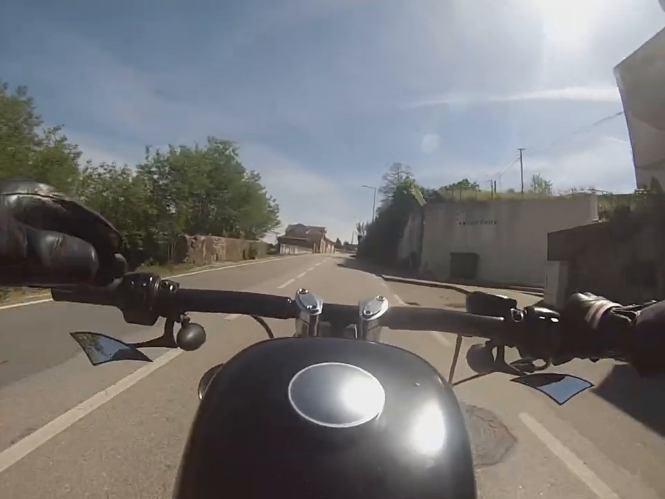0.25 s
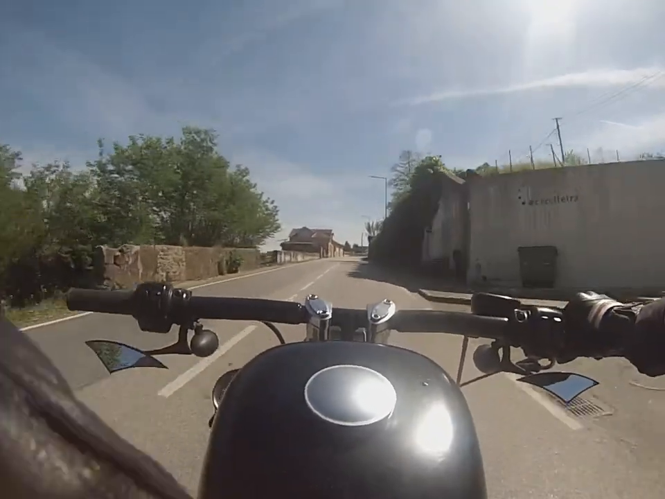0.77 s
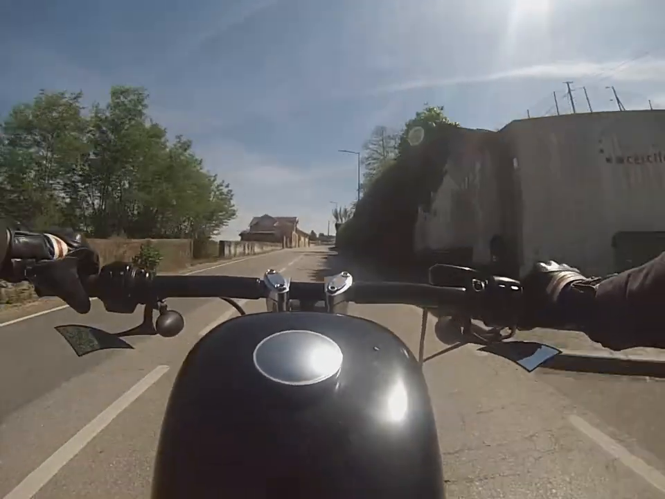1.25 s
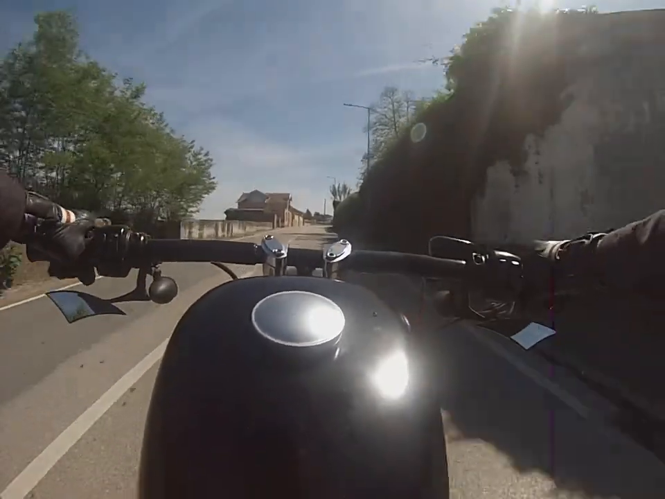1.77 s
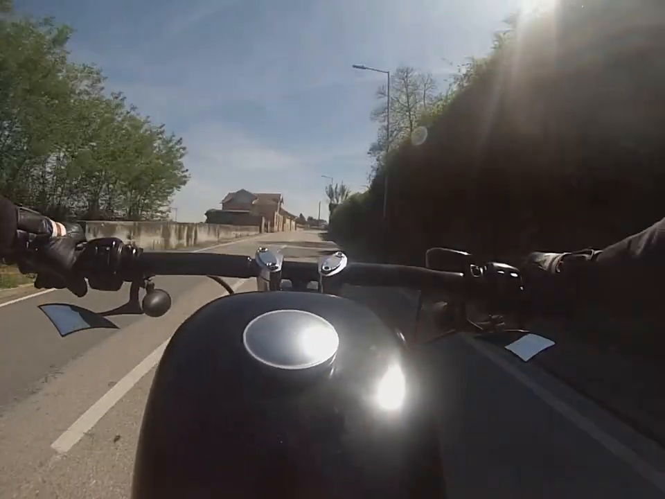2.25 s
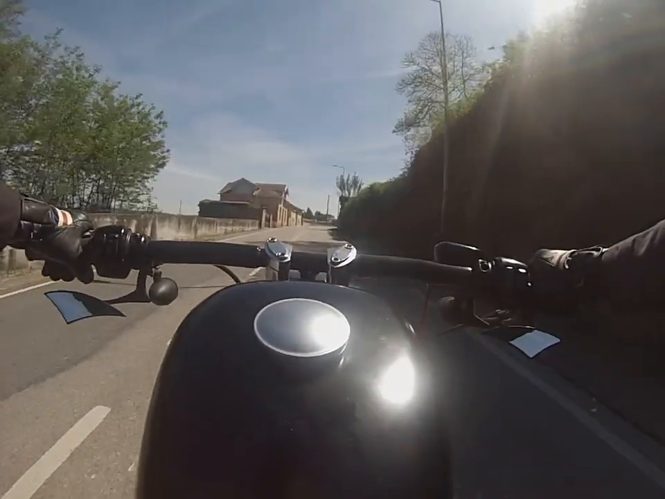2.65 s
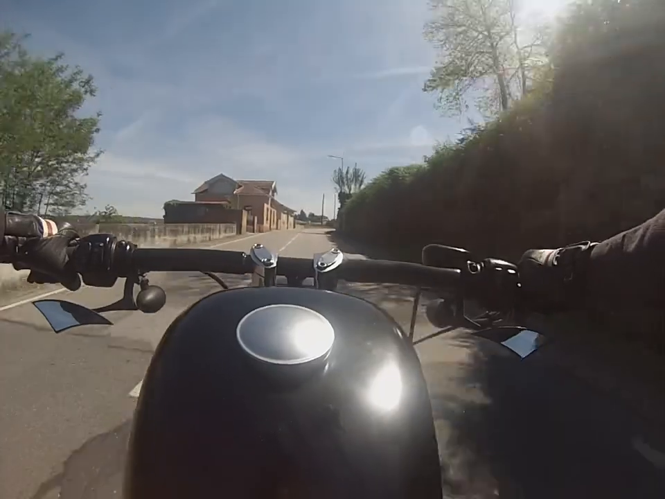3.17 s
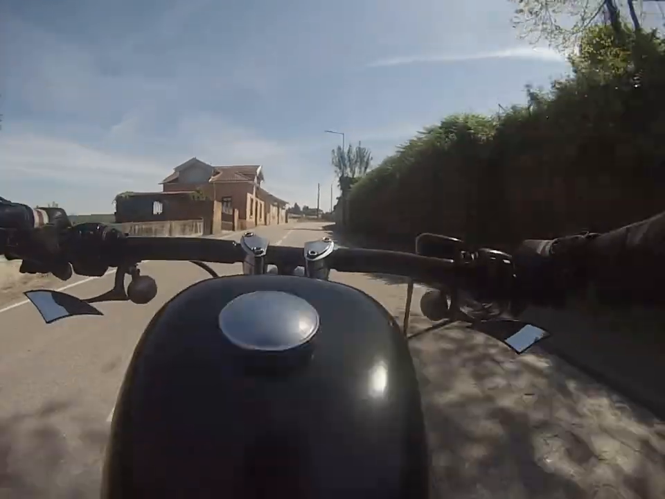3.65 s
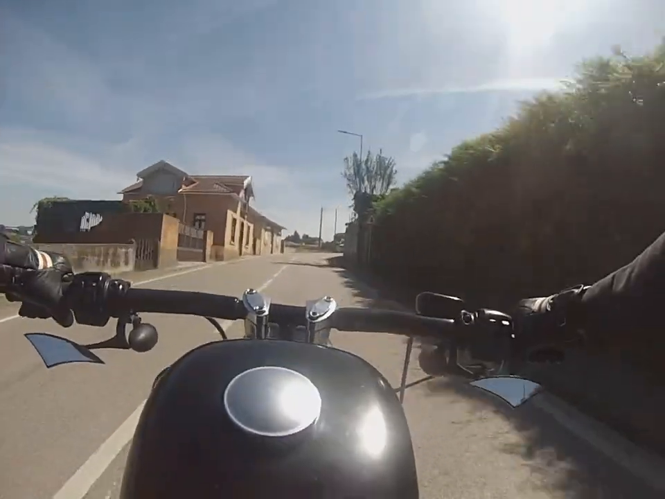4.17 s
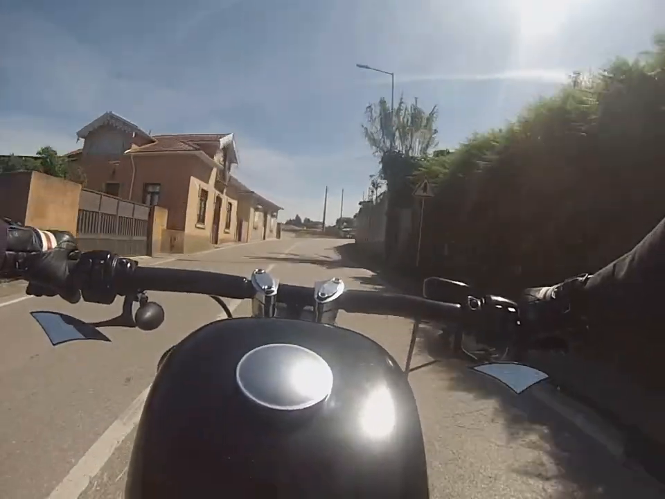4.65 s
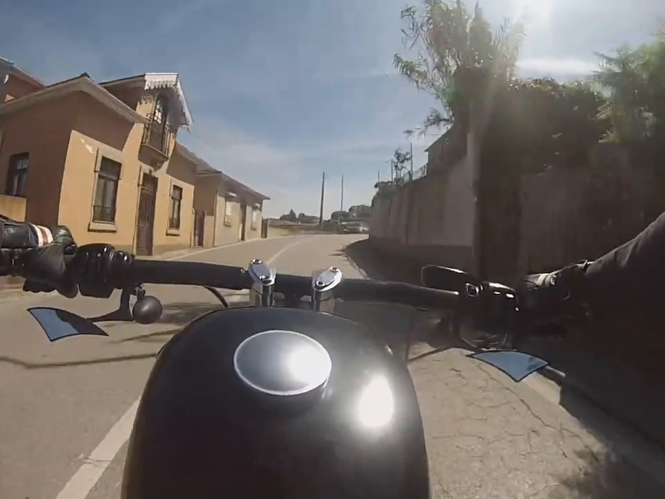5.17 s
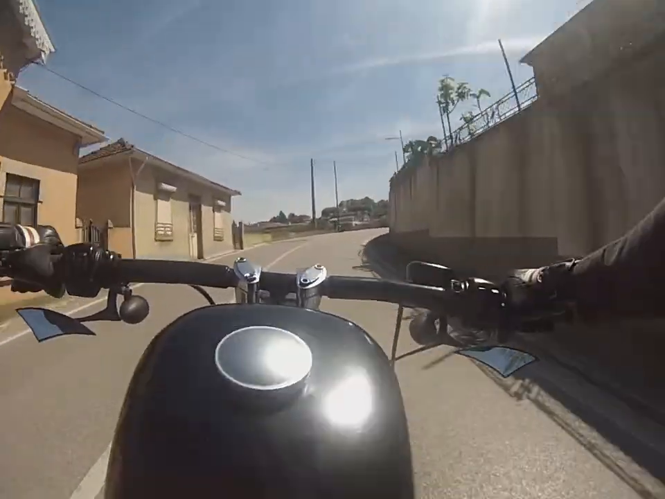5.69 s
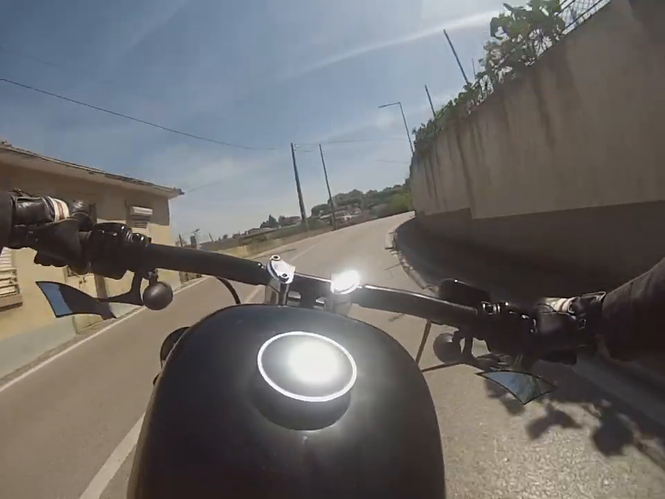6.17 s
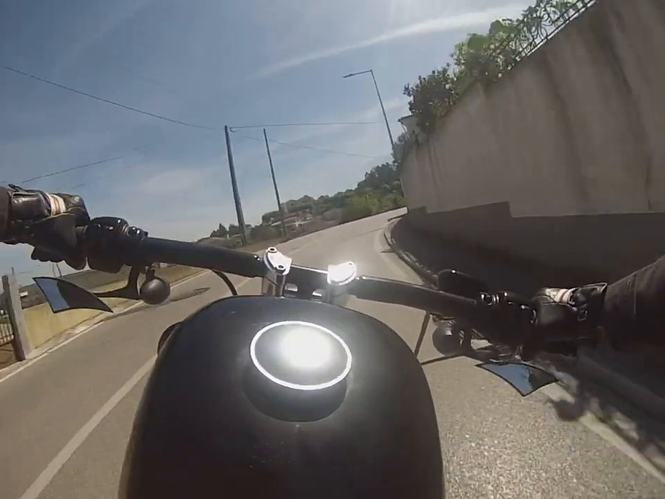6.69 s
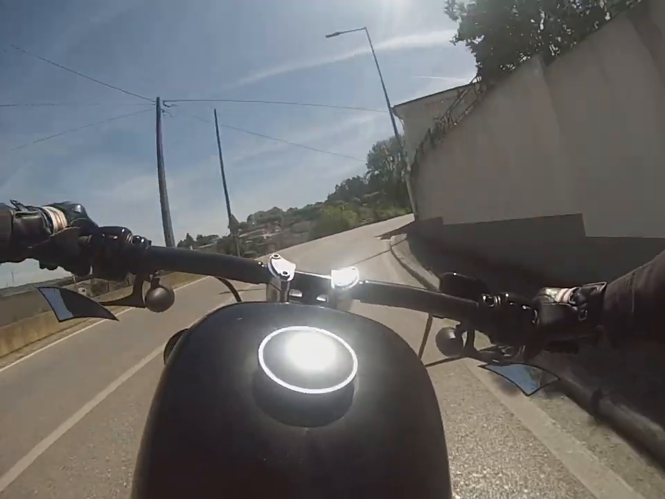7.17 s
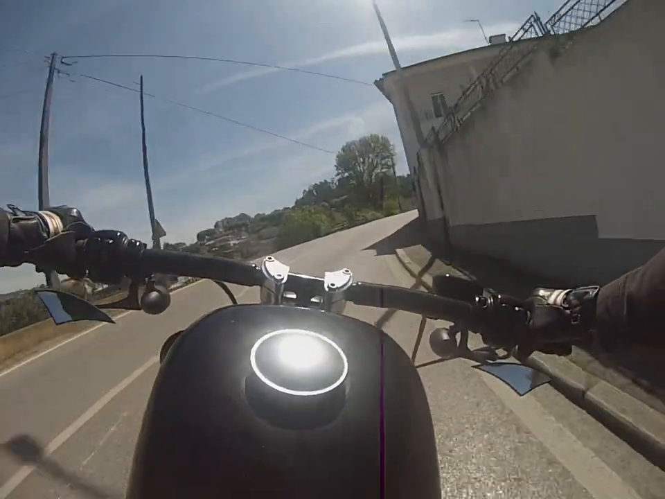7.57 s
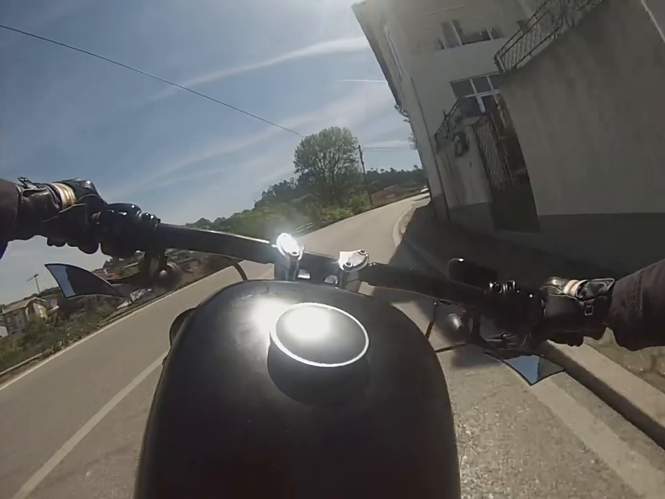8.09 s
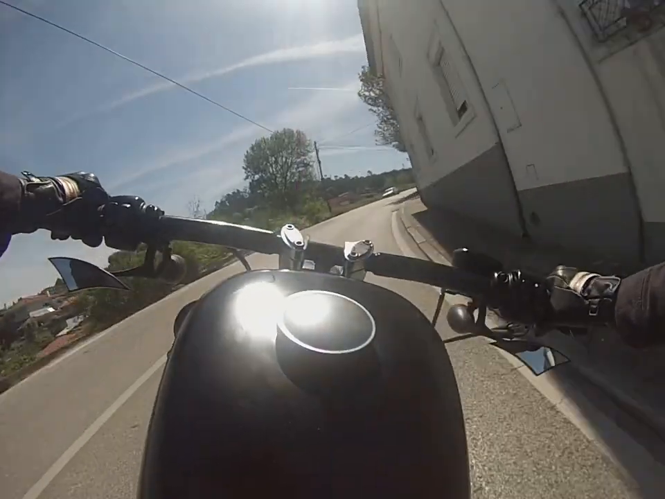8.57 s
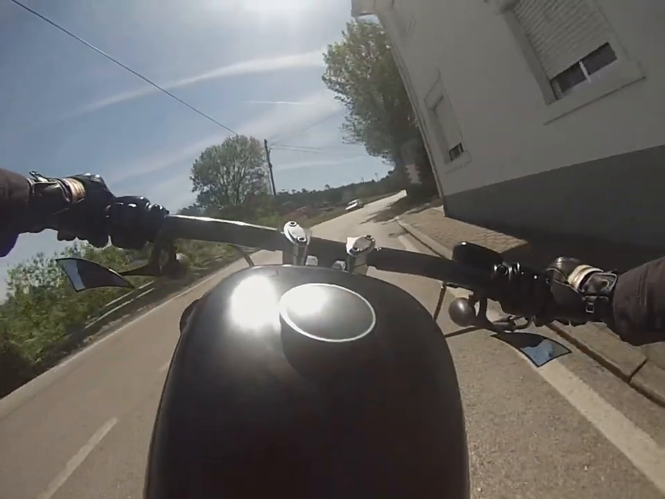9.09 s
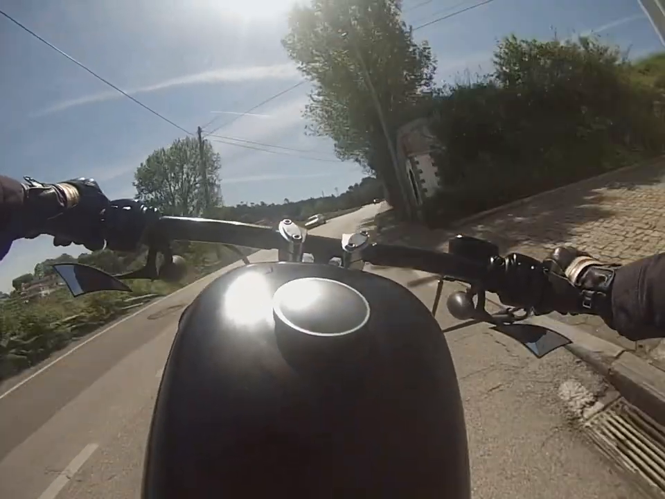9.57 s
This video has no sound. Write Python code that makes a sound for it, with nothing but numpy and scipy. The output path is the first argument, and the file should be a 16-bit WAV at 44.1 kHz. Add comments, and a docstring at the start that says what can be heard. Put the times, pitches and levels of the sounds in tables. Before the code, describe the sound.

A twin-cylinder motorcycle pulls away with a lumpy, raspy throb, eases off, then accelerates again, with buffeting wind and one hard early knock.

```python
"""On a moving V-twin motorcycle, heard by a microphone in a hard case on the rider: it pulls away, eases off, pulls again.
Two unevenly spaced firings a cycle make thumps from pressure pulses and rasp from noise bursts in the pipes.
Wind is shaped noise that buffets the case; the case rings at its own resonances; a glove brushes it early on.
One strong knock on the case makes the limiter turn everything down for about a second."""
import sys
import numpy as np
from scipy import signal
from scipy.fft import rfft, irfft, next_fast_len
from scipy.io import wavfile
from scipy.ndimage import uniform_filter1d

SR = 44100
rng = np.random.default_rng(int(sys.argv[2]) if len(sys.argv) > 2 else 0)


def persist_wave(psi):
    """Save psi, clipped to +-1, as 16-bit WAV."""
    counts = np.round(np.clip(psi, -1, 1) * 32767).astype(np.int16)
    wavfile.write(sys.argv[1], SR, np.atleast_2d(counts).T)


N = 433944
STEP = 4  # slow pressure waves are worked out at every fourth sample
KNOCK_S = .6158

# where the front and rear cylinders fire: place [fraction of an engine cycle]
FIRING_PLACES = [.376, .814]
# pulse shape, pipe returns and pipe ringing: start_s, boom_db, low_mode_db, high_mode_hz, high_mode_db,
# pulse_half_width_ms, front_return_delay_cycles, rear_return_delay_cycles, return_db, late_return_db
PIPE_STATE = [(0, -38, -39, 786, -45, 1.45, 0.235, 0.1566, -2, -26.5),
              (1.2, -55.5, -32, 776, -39, 2.33, 0.2144, 0.17, -3, -4),
              (2.3, -42, -32, 790, -38, 1.65, 0.21, 0.22, -5, -25),
              (3.4, -31, -29.5, 763, -37, 1.7, 0.22, 0.2, 2, 0),
              (4.2, -31, -30, 740, -38, 1.46, 0.22, 0.19, -0.5, -0.5),
              (4.7, -34, -34.5, 652, -43.5, 2.4, 0.23, 0.2, 6.5, -2),
              (5.4, -32.5, -36, 640, -40.5, 2.2, 0.24, 0.22, 6, 8),
              (6.1, -26, -32, 570, -41, 1.04, 0.22, 0.22, 1.5, 6),
              (6.9, -25, -30.5, 586, -39.5, 1.2, 0.22, 0.2, 1, -5),
              (7.4, -30.5, -32, 596, -34, 1.05, 0.215, 0.194, -1.5, 1),
              (8., -33, -40.5, 646, -33, 1.05, 0.22, 0.2018, 3.5, -6.5),
              (8.6, -46, -32, 700, -34.5, 1.18, 0.22, 0.2, 1, -7),
              (9.2, -41, -30, 790, -42, 1.26, 0.23, 0.22, -7, -30),
              (9.84, -27, -33, 835, -45, 0.94, 0.23, 0.22, -9, -41.5)]
# the firing blow in the frame: start_s, clack_db, dull_rear_knock_db, return_rasp_and_clack_db,
# front_share_of_rasp_and_clack_db
FRAME_BLOW = [(0, -39.5, -61, -4, -6), (.5, -34.5, -45, -18, -0.5), (1.2, -29.5, -48, -14, -1.5),
              (2.4, -30, -48, -5, -0.5), (2.85, -29, -48, -6, -2), (3.12, -26, -51.5, -7, 1),
              (3.2, -34, -47, -14.5, -1), (3.45, -25.5, -44, -7, 2), (3.56, -39, -47.5, -6, -3),
              (4.03, -27, -52.5, -5, 2), (4.15, -55, -46, -8, -5), (4.6, -45, -52.5, -9, -5),
              (6, -46, -47, -4, 1), (7, -66, -41, 0, 2.5), (7.7, -33, -37.5, -2, 3),
              (8.1, -40, -38, -1, 2.5), (8.7, -31, -36, -2, -1), (9.3, -30, -45, -0.5, 0),
              (9.84, -26, -45, -14, -6)]
# clear overtones of the exhaust: start_s, tenth_overtone_db, low_mode_hz, top_mode_hz, top_mode_db, valve_crack_db
EXHAUST_TONES = [(0, -54, 437, 940, -55, -40), (1.2, -39, 454, 930, -39, -37),
                 (2, -30.5, 483, 960, -36, -33), (2.8, -31.5, 480, 1010, -35, -32),
                 (3.5, -34, 447, 1010, -48, -31.5), (4.2, -37.5, 431.4, 990, -46, -33),
                 (4.7, -44.5, 444, 966, -59, -54), (5.6, -42, 442, 950, -48, -51),
                 (6.5, -40, 448, 945, -52, -46), (7.5, -38, 432, 965, -57, -47),
                 (8.3, -32, 467, 940, -38, -54), (8.9, -37.5, 460, 940, -31.5, -46),
                 (9.4, -25, 472, 930, -34, -47), (9.84, -30, 520, 950, -32, -46)]


def gain_of(db):
    """Decibels to a factor."""
    return 10 ** (np.asarray(db) / 20)


def evened(x):
    """Scaled to an average (rms) level of 1."""
    return x / np.sqrt(np.mean(x ** 2) + 1e-20)


def smoothed(x, size):
    """A running average over size samples, taken twice."""
    return uniform_filter1d(uniform_filter1d(x, size=size), size=size)


def steadied(x):
    """Slow changes of level divided out."""
    return x / np.sqrt(abs(smoothed(x ** 2, 4000)) + 1e-12)


def curves(rows, s):
    """Every column of a table, read at the times s."""
    t, *columns = np.transpose(rows)
    return [np.interp(s, t, column) for column in columns]


def by_throttle(ends, throttle):
    """Moves from the shut value to the wide-open value."""
    return ends[0] + (ends[1] - ends[0]) * throttle


def filled(x):
    """From every fourth sample to all samples."""
    return signal.resample_poly(x, STEP, 1, axis=-1)[..., :N]


def at_level(x, db):
    """Plays x at a level curve given for every fourth sample."""
    return gain_of(np.repeat(db, STEP)[:N]) * x


def coloured(x, points):
    """Filters without delay so that the pitches follow a curve of (Hz, dB) points."""
    hz, db = np.transpose(points)
    size = next_fast_len(len(x))
    bins_hz = np.fft.rfftfreq(size, 1 / SR)
    curve_db = np.interp(np.log(bins_hz + 1), np.log(hz), db)
    return irfft(rfft(x, size) * gain_of(curve_db), size)[:len(x)]


def resonate(x, hz, width_hz):
    """A resonance that passes its own pitch at gain 1."""
    return signal.lfilter(*signal.iirpeak(hz, hz / width_hz, SR), x)


def gliding(x, hz, width_hz):
    """A steep resonance whose pitch follows the curve hz, for every fourth sample."""
    turn = np.exp(2j * np.pi * np.cumsum(hz) * STEP / SR)
    r = np.exp(-np.pi * width_hz * STEP / SR)
    return (turn * signal.lfilter([1], [1, -2 * r, r * r], x / turn)).real


def case(x):
    """The hard case passes sound through its resonances; pairs of them take turns among the rows of x."""
    # resonances of the case: pitch_hz, width_hz, level_db
    modes = [(716, 800, -10.5), (970, 148, -1), (1195.6, 287, -3), (1488, 90, 8.5), (2047, 126, 5.5),
             (2360, 302, 0.5), (2804, 215.6, -3.5), (3118, 192, -2), (3634, 183, -5), (4100, 455, -10.5),
             (5006, 193, -6), (5364, 510, -13), (6570, 438, -15), (7665, 298, -20.5), (8370, 1100, -31),
             (9450, 470, -31), (10980, 2300, -40.5), (13000, 800, -55), (13900, 1400, -56.5)]
    x = np.atleast_2d(x)
    total = 0
    for k, (hz, width_hz, db) in enumerate(modes):
        total = total + (-1) ** k * gain_of(db) * resonate(x[k // 2 % len(x)], hz, width_hz)
    return total


def wind():
    """Lumpy air pressure buffets the case with gusts; a narrow part rings at two pitches, the lower one wavering."""
    # swells of the wind: middle_s, half_length_s, rise_db
    swells = [(0.46, 0.147, 3), (1.603, 0.15, 5), (2.394, 0.26, 6), (3.256, 0.042, 9), (3.452, 0.071, 6),
              (3.618, 0.04, 11), (5.346, 0.052, 12.5), (6.3, 0.48, 7.5), (6.79, 0.285, 2.5),
              (8.2, 0.26, 1.5), (8.9, 0.28, 5)]
    # colour of the buffeting: pitch_hz, level_db_per_hz
    buffet_colour = [(5, -29), (14, -4), (20, -13), (30, -6), (60, -14), (150, -12.5), (400, -41),
                     (2000, -94)]
    # level of the narrow ringing: start_s, level_db
    ring_levels = [(0, -52), (.5, -38.5), (1.5, -55), (2, -39.5), (3.2, -36), (3.7, -40), (4.1, -31),
                   (4.4, -40), (4.55, -32), (4.75, -44), (5.05, -35), (5.8, -42.5), (6.15, -34), (6.6, -39),
                   (7.05, -42), (7.35, -35.5), (8, -39.5), (9.84, -43.5)]
    t = np.arange(N) / SR
    buffet_db = -31.5 + sum(db * np.exp(-((t - s) / half) ** 2) for s, half, db in swells)
    a, c, lumps = rng.standard_normal((N, 3)).T
    lumps = evened(smoothed(lumps, 1500))
    buffet = evened(coloured(a, buffet_colour)) * gain_of(buffet_db + 0.46 * lumps)
    waver = evened(smoothed(a[::STEP], 1500))
    lower = steadied(filled(gliding(c[::STEP], 2431 + 10 * waver, 21.7)))  # Hz, Hz wide
    upper = evened(resonate(resonate(c, 3106, 139), 3106, 139))
    ring_db, = curves(ring_levels, t)
    ring = (lower + gain_of(-11.5) * upper) * gain_of(ring_db + 2.2 * lumps[::-1])
    return buffet + ring


def rustle_and_rattle():
    """A glove brushes the case at the start, and the case rattles after the knock: fading noise through the case."""
    t = np.arange(N) / SR
    noise, grain = rng.standard_normal((N, 2)).T
    grain_db = 2.0 * evened(uniform_filter1d(grain, size=150))
    rustle = gain_of(-34 + grain_db) * np.exp(-(t / 0.095) ** 4)
    rattle = gain_of(-19) * (t > KNOCK_S) * np.exp(-abs(t - KNOCK_S) * 1000 / 14.8)  # ms
    return (rustle + rattle) * evened(case(noise))


def hard_firings():
    """The hardest firings ring the case with a short fading tone and crack through it with noise."""
    # single hard firings: start_s, level_db, ring_hz
    hits = [(.404, -16, 2140), (.455, -16, 2144), (.5372, -18, 1410), (1.0106, -7.5, 2107),
            (1.0894, -10.5, 2060), (1.1568, -9.5, 2114), (1.279, -10, 2020), (1.3723, -14, 1997),
            (1.51, -18, 2040), (1.6172, -12.5, 2050), (1.75, -12, 2070), (1.946, -21, 1364),
            (2.0078, -12.5, 2020), (2.09, -18, 2190), (2.2563, -14, 2160), (2.3196, -13, 2050),
            (2.4, -12.5, 2090), (3.035, -12, 2220), (3.0744, -11, 2050), (3.1122, -10, 2100),
            (3.1486, -11, 2088), (3.8884, -15, 2200), (6.698, -30, 4910), (7.9588, -12, 2050),
            (8.0042, -18.5, 2060), (8.4509, -19, 1498), (8.6234, -13, 2122), (8.9161, -13, 2104),
            (9.4735, -14, 1464), (9.7617, -25, 2140)]
    rise_ms, decay_ms, crack_db = 0.56, 5.6, -10.5
    cracks, rings = np.zeros((2, N))
    ms = np.arange(1500) * 1000 / SR
    shape = (1 - np.exp(-(ms / rise_ms) ** 2)) * np.exp(-ms / decay_ms)
    for s, db, hz in hits:
        cracks[round(s * SR):][:1500] += gain_of(db + crack_db) * shape
        rings[round(s * SR):][:1500] += gain_of(db) * shape * np.sin(2 * np.pi * hz * ms / 1000)
    return rings + cracks * evened(case(rng.standard_normal(N)))


def knock():
    """A hand strikes the case: a quick squeeze, a deep push that swings back slowly, and the wall rings."""
    # the strike, a single row: level_db, push_length_ms, ring_db
    strike = (13.1, 3.77, -6.5)
    db, push_ms, ring_db = strike
    ms = (np.arange(N) / SR - KNOCK_S) * 1000
    squeeze = 0.21 * np.exp(-((ms + 0.213) / 0.51) ** 2)
    push = -np.sin(np.pi * np.clip(ms / push_ms, 0, 1)) ** 2
    u = np.maximum(ms, 0)
    # pitches here are in cycles per millisecond
    swing = 0.406 * np.sin(2 * np.pi * 0.0386 * np.maximum(u - 3.3, 0)) * np.exp(-(u / 27) ** 6)
    after = np.maximum(ms - 2.5, 0)
    ring = np.sin(2 * np.pi * 2.07 * after) * np.exp(-after / 2.8)
    return gain_of(db) * (squeeze + push + swing + gain_of(ring_db) * ring)


def firing_pulses(t, turned, pulse, throttle, misfire, chance):
    """Each firing is a pressure pulse with suction dips, and the pipe sends it back; gas bursts and blows go along."""
    # sharp pressure dips on both sides of the rear firing: start_s, depth_db
    rear_dips = [(8.2, -23), (8.9, -7.5), (9.4, -2), (9.84, -2)]
    _, _, _, _, width_ms, front_lag, rear_lag, back_db, late_db = curves(PIPE_STATE, t)
    _, _, back_rasp_db, front_db = curves(FRAME_BLOW, t)
    # each pair: value with the throttle shut, value wide open
    rear_db = by_throttle((-4.5, 1), throttle)
    suck_db = by_throttle((-21.5, -2.5), throttle)
    rear_width_ms = by_throttle((2.4, 1.1), throttle)
    rear_edge_db = by_throttle((-6, 2), throttle)
    rear_place = FIRING_PLACES[1]
    thump = pulse(rear_place + 2 * rear_lag, late_db - 2.5, 2.1)  # the late return
    puff = edge = blow = 0
    # the rear cylinder lights more unevenly
    cylinders = zip(FIRING_PLACES, [front_lag, rear_lag], [0, rear_db], [.45, 1.1])
    for k, (place, lag, db, uneven) in enumerate(cylinders):
        late, size, echo, hard, *gas = chance[np.floor(turned - place + 1.15).astype(int), k].T
        slip = 4.6 * (uneven * misfire) ** 2 * late  # ms
        db = db + 9.1 * uneven * misfire * size
        ms_wide = [width_ms, rear_width_ms][k]  # the rear pulse is rounder with the throttle shut
        edge_db = db + k * rear_edge_db
        echo_db = back_db + .7 * echo
        thump = thump + pulse(place, db, ms_wide, slip)
        thump = thump + pulse(place + lag, db + echo_db, 1.04 * ms_wide, slip)
        # suction before the pulse and before its return
        thump = thump - pulse(place - .055, db + suck_db, 0.35 * width_ms, slip)
        thump = thump - pulse(place + 0.542 * lag, db + suck_db + 0.098, 0.59 * width_ms, slip)
        edge = edge + pulse(place - .015, edge_db, 0.33, slip) + pulse(place + lag, edge_db - 2.5, 0.53, slip)
        last_blow = pulse(place - .045, db + 0.7 * hard, 1.15, slip)
        share_db = (1 - k) * front_db
        db = db + share_db
        blow = blow + last_blow * gain_of(share_db)
        blow = blow + pulse(place + lag, db + back_rasp_db + 0.5 + 3.5 * gas[0], 0.87, slip)
        # two rows of gas bursts, so that each burst favours other case resonances
        first, second = 2.2 * np.array(gas[:2]), 2.2 * np.array(gas[2:])
        puff = puff + pulse(place - 0.025, db, 4.4, slip) * gain_of(first)
        puff = puff + pulse(place + lag, db + back_rasp_db, 2.2, slip) * gain_of(second)
    dip_db, = curves(rear_dips, t)
    thump = thump - pulse(rear_place + 0.086, dip_db, 1.2) - pulse(rear_place - .095, dip_db - 4.5, 1.0)
    return thump, edge, puff, blow, last_blow


def unburnt_pops(t, misfire):
    """Unburnt gas pops in the pipe at odd moments while misfiring is strong, with one loud pop as the engine eases."""
    when, size = rng.random((len(t), 2)).T
    pops_per_s = 90. * np.maximum(misfire - .3, 0)
    pops = (when < pops_per_s * STEP / SR) * size
    pops[round(5.35 * SR / STEP)] = 2.5  # the loud pop, at 5.35 s
    thump = 0.74 * signal.oaconvolve(pops, signal.windows.gaussian(200, 12.), "same")
    edge = 0.57 * signal.oaconvolve(pops, signal.windows.gaussian(40, 3.), "same")
    return thump, edge


def pipe_rings(t, turned, pulse, edge):
    """Sharp pulse edges and the cracking open of the exhaust valves ring the pipe at pitches that glide."""
    # how long before each pulse the front and rear exhaust valves open: lead [cycles]
    valve_lead = [.085, .095]
    boom_db, low_db, high_hz, high_db, *_ = curves(PIPE_STATE, t)
    tenth_db, low_hz, top_hz, top_db, valve_db = curves(EXHAUST_TONES, t)
    valve = pulse(FIRING_PLACES[0] - valve_lead[0], -4, 0.12) + pulse(FIRING_PLACES[1] - valve_lead[1], 0, 0.11)
    rings = gain_of(low_db) * steadied(gliding(edge, low_hz, 163.0))
    rings = rings + gain_of(high_db) * steadied(gliding(edge, high_hz, 228.0))
    rings = rings + gain_of(boom_db) * steadied(gliding(edge, 326 + 0 * t, 137.0))
    # ten waves in each engine cycle
    rings = rings + gain_of(tenth_db) * np.sqrt(2) * np.cos(20 * np.pi * (turned - .077))
    rings = rings + gain_of(top_db) * steadied(gliding(valve, top_hz, 196.0))
    rings = rings + gain_of(valve_db) * steadied(gliding(valve, high_hz, 280.0))
    return filled(rings)


def gas_noise(puff, speed, throttle):
    """Hot gas rasps in bursts around the pulses, starting just ahead of them, hisses more steadily and burbles."""
    # colours of the rasp and the hiss before the case: pitch_hz, level_db
    rasp_colour = [(600, -5), (2000, -3.5), (5000, 0.5), (9000, -0.5), (13000, 3.5)]
    hiss_colour = [(300, 18), (800, 4), (1500, -0.5), (3000, -0.5), (5500, -5.5), (9000, 1.5), (14000, 3)]
    # colour of the burble of churning gas in the pipe: pitch_hz, level_db_per_hz
    burble_colour = [(40, 1), (80, -4), (160, -4), (300, 0), (520, -12.5), (750, -39), (1500, -60)]
    a, b, d, flicker = rng.standard_normal((N, 4)).T
    # levels with the throttle shut and wide open
    rasp_db = by_throttle((-58, -20.5), throttle)
    hiss_db = by_throttle((-33.5, -25), throttle) + 0.66 * (speed - 24)  # louder at more cycles a second
    burble_db = by_throttle((-33, -34.5), throttle)
    bursts = filled(puff)
    rasp = steadied(case(bursts * coloured(a, rasp_colour)))
    flicker_db = 0.95 * evened(smoothed(flicker, 200))
    hiss = b * gain_of(flicker_db) * (1 + 0.12 * bursts[1])
    hiss = evened(case(coloured(hiss, hiss_colour)))
    burble = steadied(coloured(d * (1.3 + bursts[0]), burble_colour))
    return at_level(rasp, rasp_db) + at_level(hiss, hiss_db) + at_level(burble, burble_db)


def frame_blows(t, turned, pulse, chance, blow, rear_blow, puff):
    """Firing blows clack brightly in the frame, the rear one knocks duller and the front one clangs hollowly."""
    # level of the hollow clang: start_s, level_db
    clang_levels = [(0, -48), (1.2, -36), (2.4, -37), (3.5, -39), (4.6, -48), (6.3, -41), (7.2, -40.5),
                    (8.2, -37), (9, -37), (9.84, -38)]
    clack_db, throb_db, _, _ = curves(FRAME_BLOW, t)
    clang_db, = curves(clang_levels, t)
    _, _, top_hz, _, _ = curves(EXHAUST_TONES, t)
    a, c = rng.standard_normal((N, 2)).T
    clack = steadied(resonate(resonate(filled(blow) * c, 2111, 2 * 162), 2111, 162))
    rear_noise = (rear_blow + 0.21 * puff[0]) * rng.standard_normal(len(t))
    throb = steadied(filled(gliding(rear_noise, top_hz, 125)))
    front = pulse(FIRING_PLACES[0] + 0.045, 3. * chance[(turned + .1).astype(int), 0, 4], 3.)
    clang = steadied(resonate(resonate(filled(front) * a, 1460, 2 * 160), 1460, 160))
    return at_level(clack, clack_db) + at_level(throb, throb_db) + at_level(clang, clang_db)


def valve_tick(t, turned, pulse, chance):
    """A valve ticks once a cycle: a noise burst of varying strength through three narrow resonances."""
    # level of the tick: start_s, level_db
    tick_levels = [(0, -69), (2.8, -63), (3.4, -56), (5, -59), (6.5, -60.5), (7.7, -61.5), (8.3, -60),
                   (9.84, -62)]
    # resonances of the tick: pitch_hz, width_hz, level_db
    tick_modes = [(4120, 340, 5), (8740, 440, 0), (9505, 530, -2.5)]
    burst = pulse(0.12, 2.4 * chance[turned.astype(int), 0, 3], 2.5)
    noise = filled(burst) * rng.standard_normal(N)
    tick = sum(gain_of(db) * resonate(resonate(noise, hz, w), hz, w) for hz, w, db in tick_modes)
    tick_db, = curves(tick_levels, t)
    return at_level(steadied(tick), tick_db)


def engine():
    """The turning engine sets when its pulses come; they thump and ring in the pipes, rasp, clack and tick."""
    # engine speed, where one cycle is two crank turns: start_s, cycles_per_s
    speeds = [(0.0, 19.18), (0.45, 19.358), (1.0, 20.255), (1.6, 22.425), (2.2, 24.376), (2.8, 26.097),
              (3.5, 27.175), (4.1, 27.371), (4.6, 26.403), (5.1, 25.378), (5.7, 24.134), (6.3, 23.604),
              (6.8, 22.84), (7.2, 21.972), (7.7, 21.85), (8.4, 22.59), (8.9, 24.285), (9.4, 26.904),
              (9.9, 29.069)]
    # how the engine is driven: start_s, thump_db, throttle [0-1], misfiring [0-1]
    drive = [(0, -25.5, 0.2, 0.25), (.13, -26.5, 0, 0.04), (.3, -20.5, 0.56, 0.02), (.5, -19, 0.67, 0.34),
             (1., -18, 0.7, 0), (1.8, -19, 0.78, 0.01), (2.6, -16, 0.82, 0.04), (3.3, -14.5, 0.77, 0.27),
             (3.6, -15, 0.62, 0.19), (3.9, -14, 0.69, 0.22), (4.3, -17, 0.45, 0.04),
             (4.7, -20.5, 0.35, 0.44), (5.5, -22, 0.42, 0.36), (5.9, -21.5, 0.39, 0.4),
             (6.5, -23.5, 0.41, 0.25), (6.9, -17.5, 0.46, 0.25), (7.55, -16.5, 0.51, 0.03),
             (7.75, -14.5, 0.73, 0.02), (8.3, -14, 0.76, 0.06), (8.7, -15, 0.87, 0.03),
             (9.3, -15.5, 0.91, 0.07), (9.84, -18, 0.87, 0)]
    # colour the pipe gives the thump: pitch_hz, level_db
    pipe_colour = [(20, -52.5), (45, -1), (80, 0), (130, 5), (190, 3.5), (260, 7), (330, 1), (460, 9.5),
                   (600, -4), (900, -33), (1300, -18.5), (2500, -50)]
    t = np.arange(0, N + STEP, STEP) / SR
    speed, = curves(speeds, t)
    turned = np.cumsum(speed) * STEP / SR  # cycles so far
    cycle_ms = 1000 / speed
    thump_db, throttle, misfire = curves(drive, t)
    misfire = np.clip(misfire, 0, 1)
    chance = rng.standard_normal((int(turned[-1]) + 3, 2, 8))  # cycle, cylinder, kind of unevenness

    def pulse(place, db, ms_wide, slip=0):
        """One hump a cycle at this place, moved by slip ms; ms_wide runs from its middle outward."""
        ms = ((turned - place + .5) % 1 - .5) * cycle_ms - slip
        return gain_of(db) * np.exp(-abs(ms / ms_wide) ** 1.77)

    thump, edge, puff, blow, rear_blow = firing_pulses(t, turned, pulse, throttle, misfire, chance)
    pop_thump, pop_edge = unburnt_pops(t, misfire)
    thump = steadied(coloured(filled(thump + pop_thump), pipe_colour))
    return (at_level(thump, thump_db)
            + pipe_rings(t, turned, pulse, edge + pop_edge)
            + gas_noise(puff, speed, throttle)
            + frame_blows(t, turned, pulse, chance, blow, rear_blow, puff)
            + valve_tick(t, turned, pulse, chance))


def scene():
    """Wind, touches on the case and the engine add up at one microphone."""
    return (wind() + rustle_and_rattle() + hard_firings() + knock() + engine())[None]


def record(dry):
    """A limiter turns down quickly on peaks and recovers slowly; then the highest treble is cut."""
    peak_db = 20 * np.log10(abs(dry[0]) + 1e-9)
    fall = np.arange(N) * 15.7 / SR  # recovery of 15.7 dB a second
    over_db = np.maximum(np.maximum.accumulate(peak_db + fall) - fall + 0.143, 0)
    over_db = uniform_filter1d(over_db, size=81, origin=-40)  # looks slightly ahead
    low_pass = signal.firwin(1023, 15300, window=("kaiser", 9), fs=SR)  # cut above 15300 Hz
    return signal.oaconvolve(dry / gain_of(over_db), low_pass[None], "same")


dry = scene()
out = record(dry)
persist_wave(out)
```